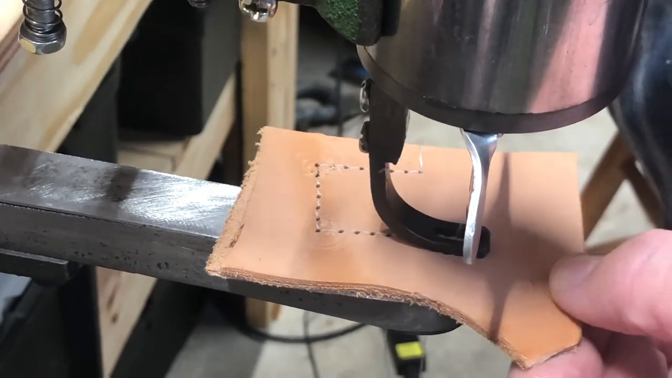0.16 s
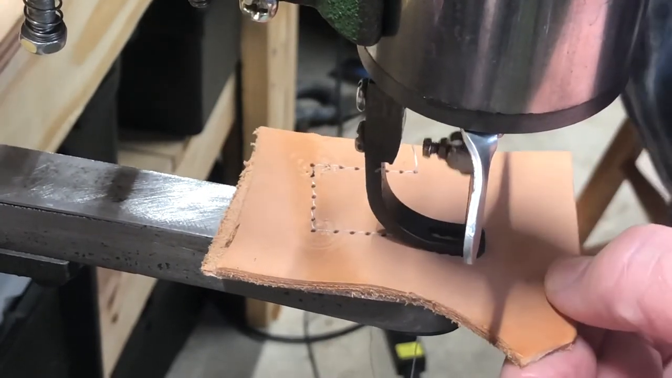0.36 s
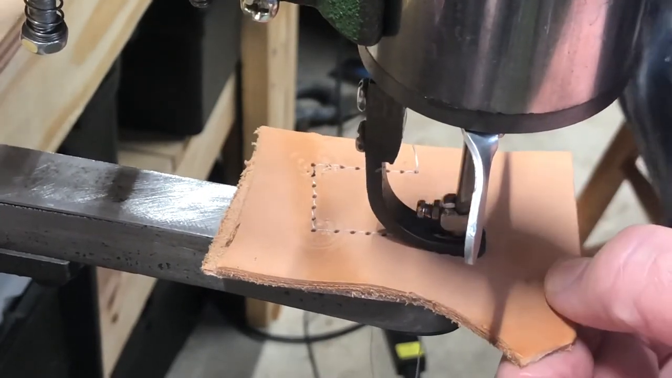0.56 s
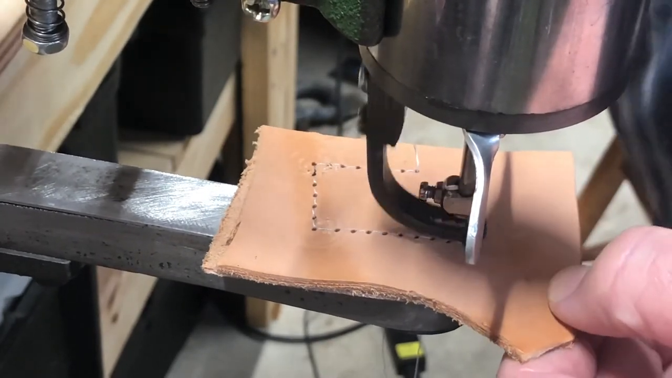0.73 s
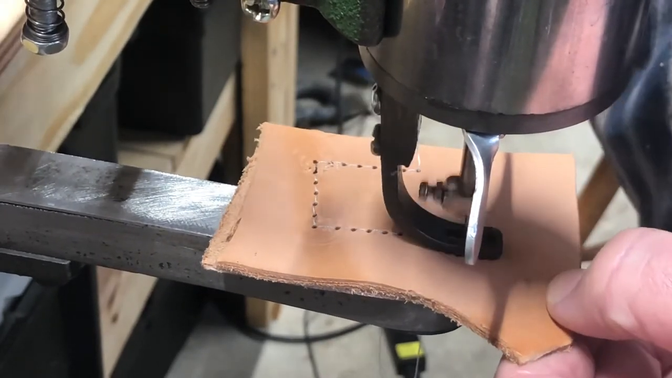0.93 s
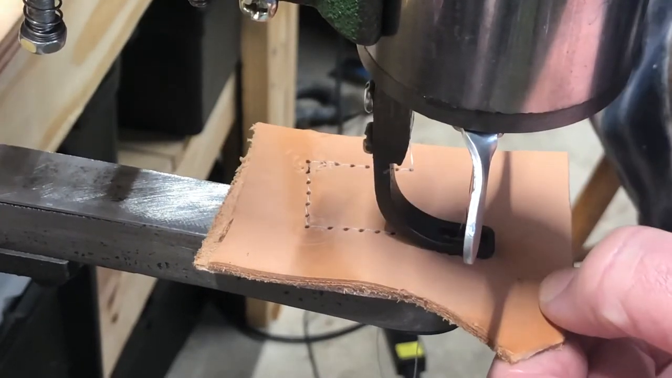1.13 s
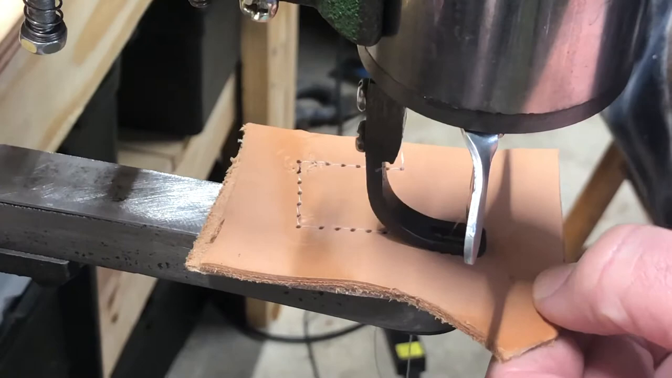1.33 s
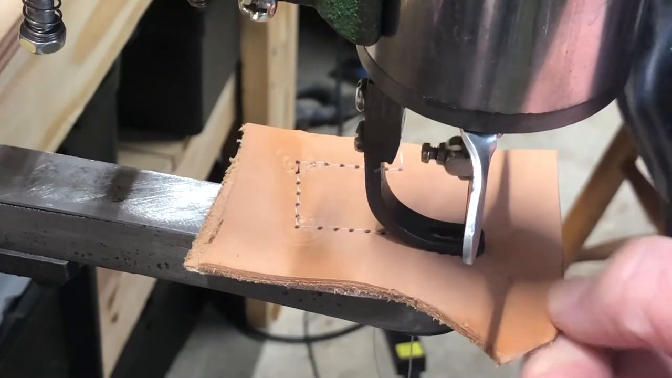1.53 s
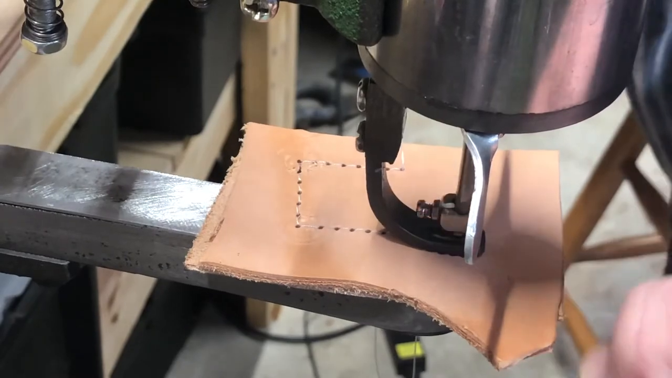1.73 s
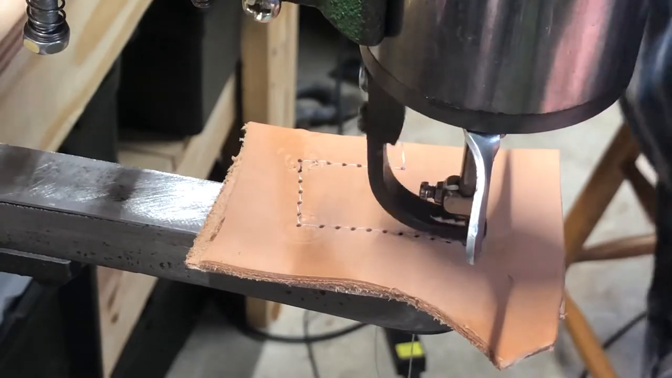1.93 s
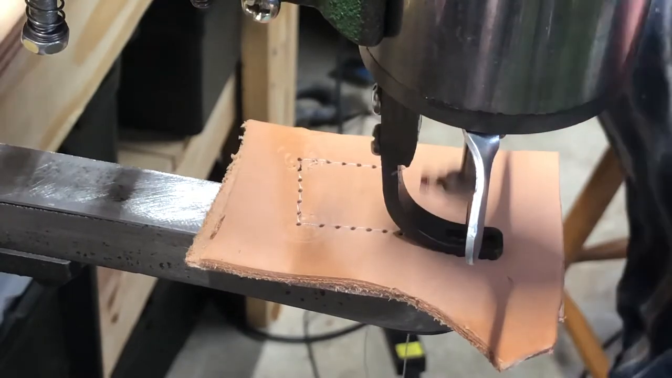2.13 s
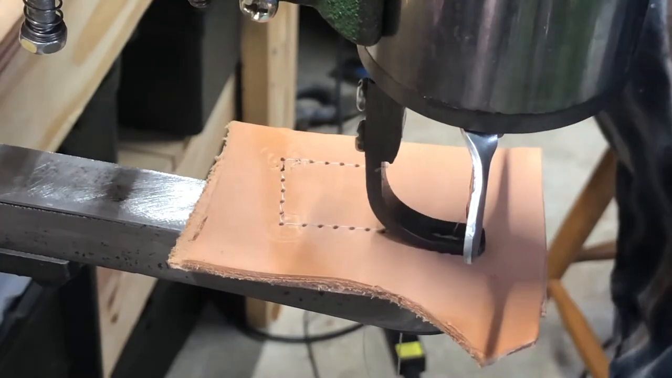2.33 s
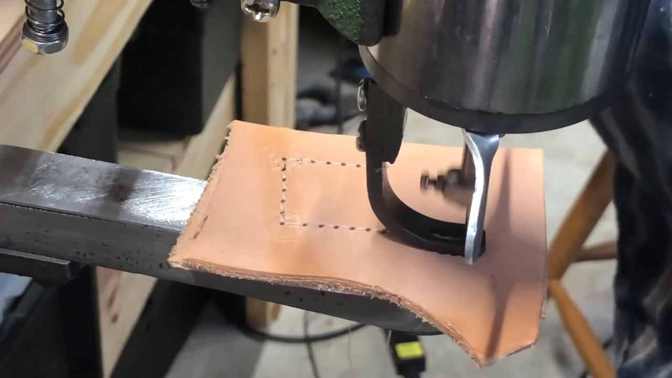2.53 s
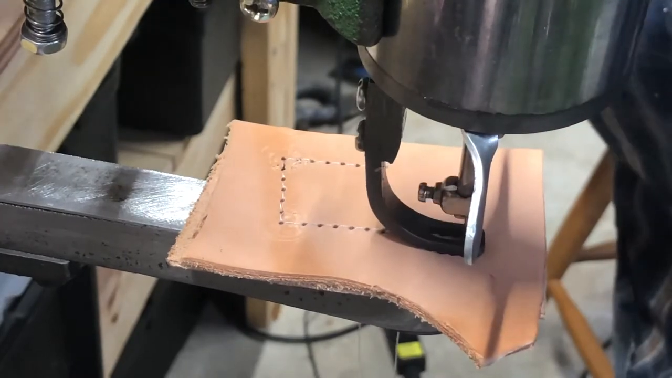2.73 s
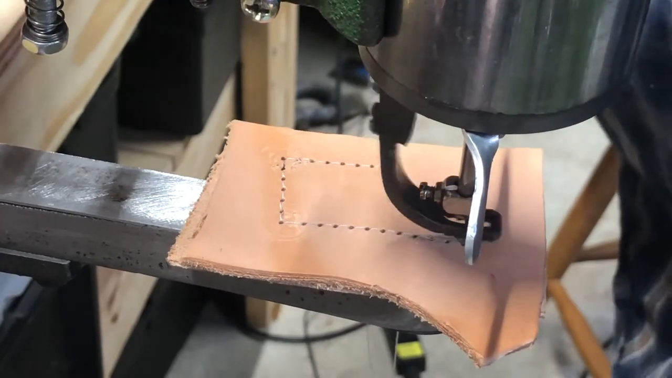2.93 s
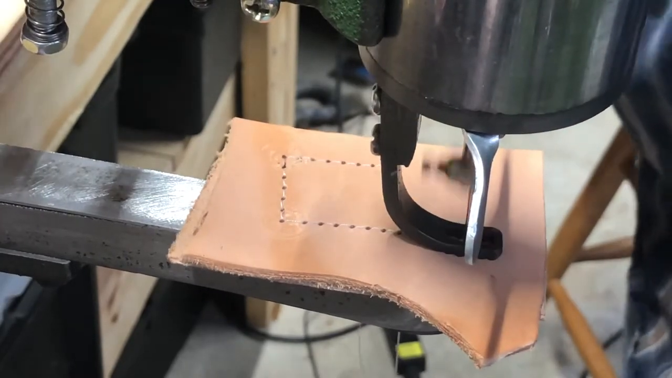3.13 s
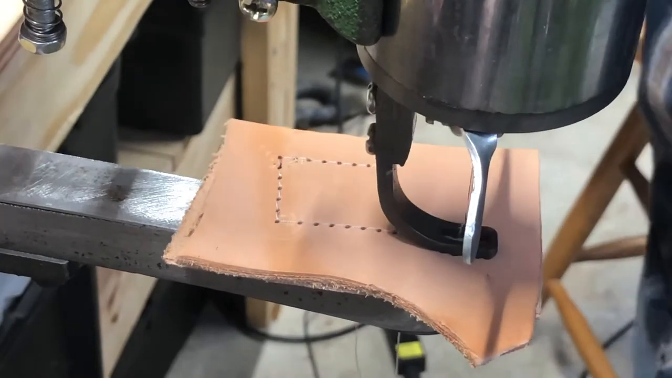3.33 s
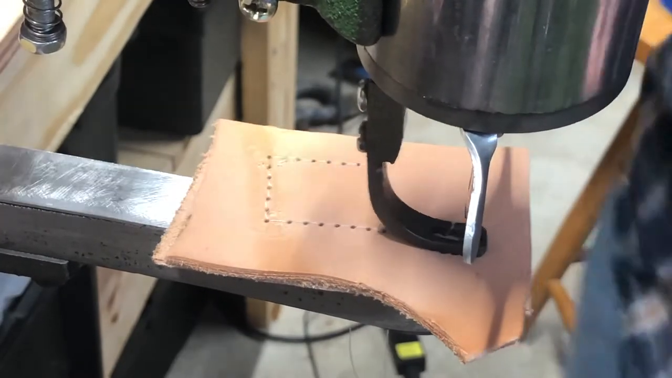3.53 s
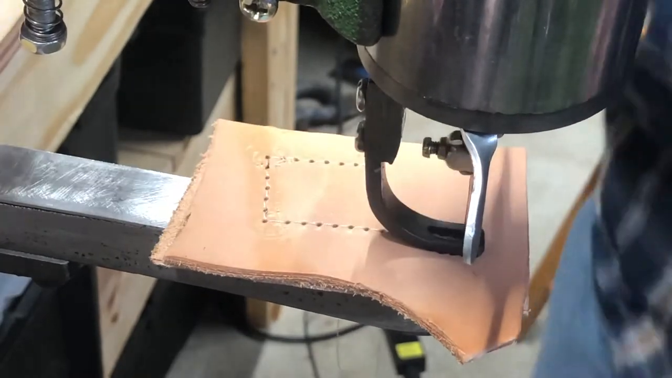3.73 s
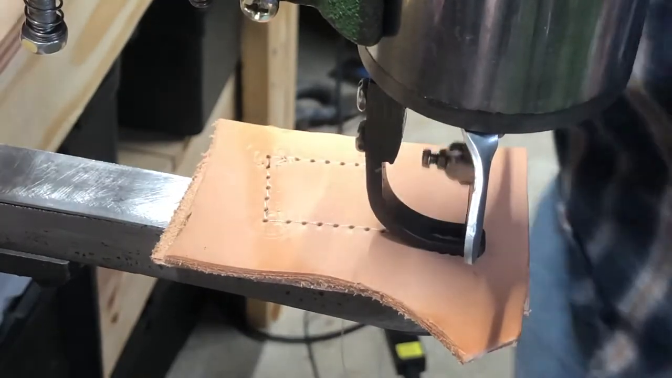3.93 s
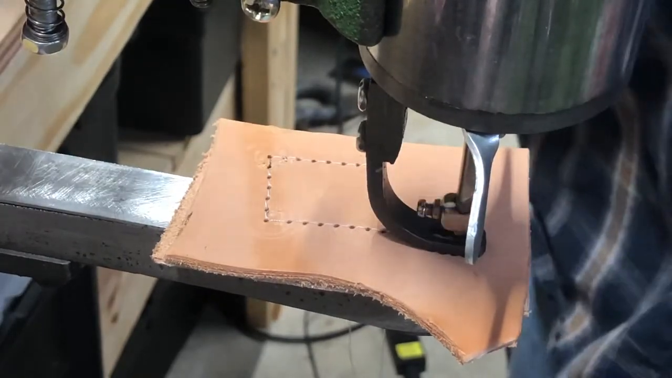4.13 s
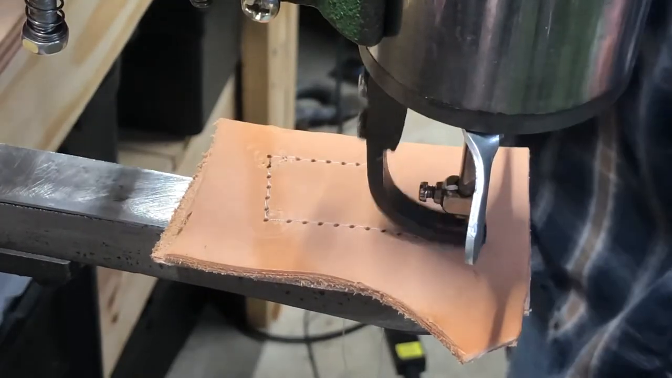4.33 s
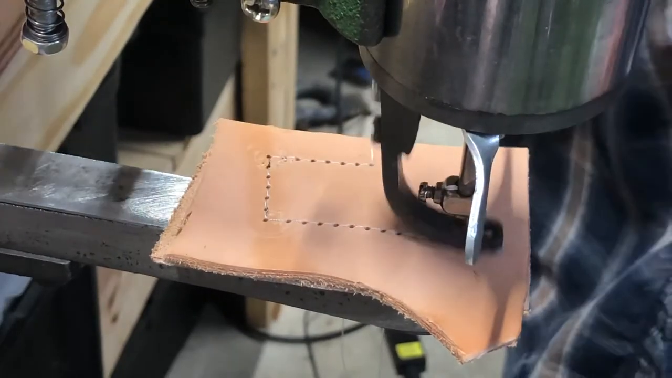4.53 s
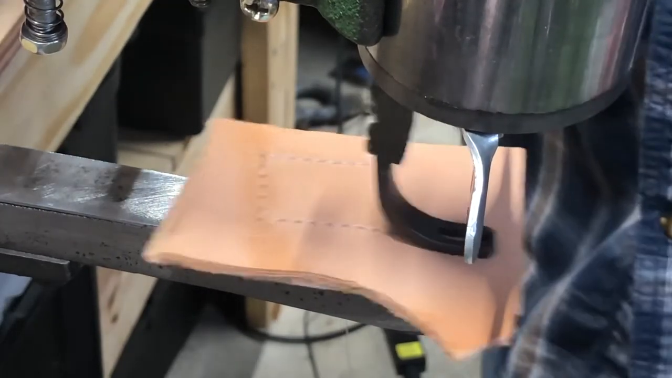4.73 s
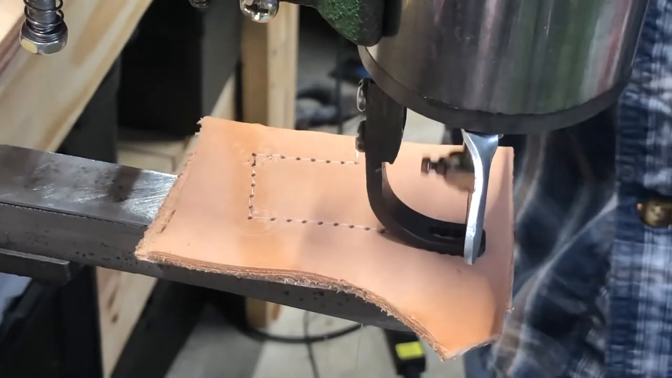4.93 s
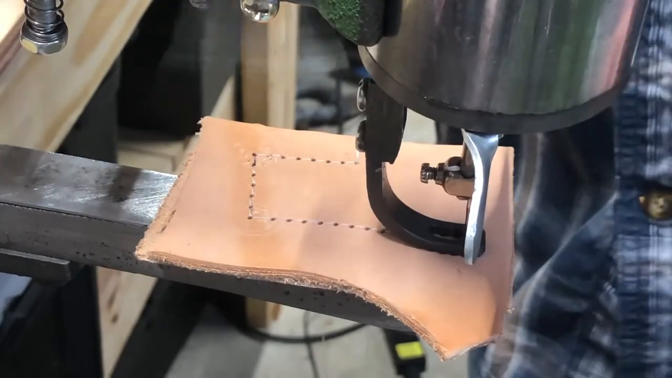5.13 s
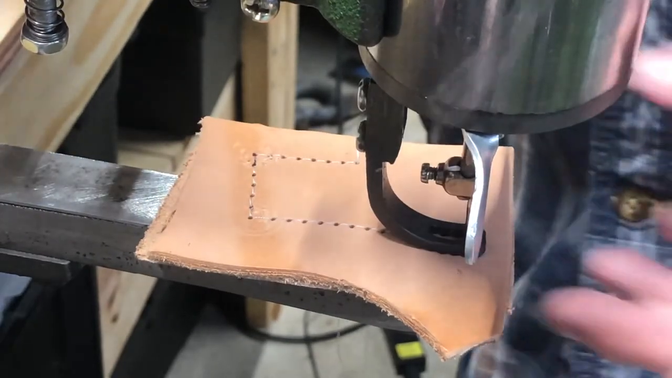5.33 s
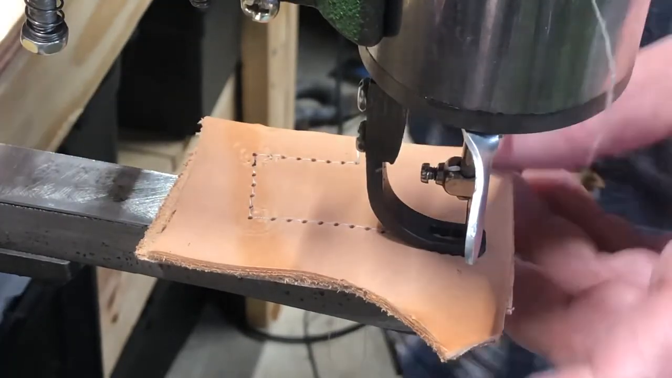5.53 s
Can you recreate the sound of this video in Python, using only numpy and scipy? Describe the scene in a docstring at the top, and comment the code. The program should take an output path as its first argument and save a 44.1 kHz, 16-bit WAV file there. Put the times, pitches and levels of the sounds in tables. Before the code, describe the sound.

A hand-cranked leather stitching machine on a wooden bench makes four slow stitches, heard close up in a workshop with a low steady hum and short reverberation. The stitches run from about 0.4 to 1.0 seconds, 1.5 to 2.1, 2.4 to 3.1 and 3.9 to 4.6. In each, the thread lever ticks, the mechanism thuds, the needle bar clacks, the feed clicks and the presser foot snaps down sharply. Underneath, gears rumble through the iron frame and steel slides scrape, with small rattles and faint, very high squeaks. A soft rumbling swell comes at the start and after each stitch as the needle bar rises. A shirt rustles softly from about 3.3 to 3.8 seconds, and again from 5 seconds as the crank comes to rest. Something creaks faintly at 5.1 seconds, followed by one dry tick at 5.3.

```python
"""A hand-cranked leather stitcher on a wooden bench makes four stitches, close by, in a humming workshop.
Cams and gears rumble through the iron frame and the slides scrape. In each turn the thread lever ticks,
the cam takes up its load with a thud, the needle bar clacks, the feed clicks, the presser foot snaps
down and the needle bar rises in a soft swell. A shirt rustles before the last stitch and again as the
crank comes to rest; something creaks faintly and gives one dry tick."""
import sys
import numpy as np
from scipy import signal
from scipy.fft import rfft, irfft, next_fast_len
from scipy.io import wavfile
from scipy.ndimage import uniform_filter1d

SR = 44100
rng = np.random.default_rng(int(sys.argv[2]) if len(sys.argv) > 2 else 0)


def store_pcm(level_fs):
    """Save levels as 16-bit WAV."""
    pcm = np.round(np.clip(level_fs, -1, 1) * 32767).astype(np.int16)
    wavfile.write(sys.argv[1], SR, np.atleast_2d(pcm).T)


N = 245637
STOP_S = 4.85  # the crank starts coming to rest

# Blows. Each row: start in seconds, relative level in dB, knock over crack in dB, tilt in dB per octave.
LEVER_BLOWS = [(0.38, -33, -9.5, 3.5), (1.5191, -29.5, -9.5, 4), (2.417, -30, -12, 3.5),
               (3.357, -39.5, -0.5, -2.5), (3.9042, -33.5, -10, 2)]
NEEDLE_BLOWS = [(0.5821, -12.5, -19, -0.5), (0.5959, -18.5, 4.5, -2), (1.7654, -14.5, -1.5, 1.5),
                (2.6467, -13, -10, 0.5), (2.6617, -31.5, -4, 3.5), (4.2009, -15, 1.5, 0)]
FEED_BLOWS = [(0.7043, -19.5, 4.5, 4.5), (1.894, -21.5, 5, 4), (2.8336, -27.5, -9, -2),
              (4.374, -26.5, 3.5, 2)]
FOOT_BLOWS = [(0.9195, -12.5, -6, 1.5), (2.0894, -11.5, -7, 3.5), (3.0847, -15, -24, 1),
              (4.6054, -17.5, -21, 5), (4.609, -14, -10.5, 1.5), (4.6136, -8, -15, 0),
              (4.622, -13.5, -12, -2)]
# Iron frame. Each row: frequency in Hz, level in dB.
FRAME_SPECTRUM = [(30, -63), (100, -4), (160, -5.5), (300, 0), (600, -1), (850, -2.5), (1050, -8),
                  (1550, -19.5), (2500, -20), (4000, -27), (8000, -36), (16000, -96.5)]
# Its resonances. Each row: frequency in Hz, width in Hz, lift in dB.
FRAME_MODES = [(186.2, 4.9, 13.5), (235.3, 19.6, 11.5), (321.5, 12, 6), (406, 41, 3), (457.7, 20, 5.5),
               (550, 15, 5), (663, 36, 3), (688, 22, 2.5), (741, 30, 6), (847, 46, -0.5), (912, 25, 1.5),
               (1145, 57, 7.5), (1252, 78, 5.5), (1440, 130, 6.5), (1809, 33, 10), (2130, 100, -0.5),
               (2666, 80, 5), (2980, 94, 5)]
# The cam takes up its load. Each row: start in seconds, relative tick level in dB, thud level in dB,
# run-out after the foot drops in seconds.
CAM_LOADS = [(0.4876, -26, -27.5, 0.2), (1.6604, -24, -31.5, 0.21), (2.5434, -27, -32.5, 0.21),
             (4.0895, -27.5, -37, 0.32)]
# The needle bar rises. Each row: slide release in seconds, delay to the crest in seconds,
# half width in seconds, rumble in dB, scrape in dB, scrape length in seconds.
RETURN_STROKES = [(0.115, 0.068, 0.099, -40, -51, 0.11), (1.2435, 0.066, 0.095, -40.5, -53, 0.11),
                  (2.245, 0.062, .095, -38.5, -48, 0.089), (3.463, 0.072, 0.11, -40, -52, 0.13),
                  (4.707, 0.065, 0.058, -37.5, -47.5, 0.075)]


def amp(db):
    """Decibels to gain."""
    return 10 ** (np.asarray(db) / 20)


def unit(x):
    """Scale to rms 1."""
    return x / np.sqrt(np.mean(x ** 2) + 1e-20)


def fade(t, t60_s):
    """Exponential decay, 60 dB down at t60_s."""
    return np.exp(-np.log(1000) * t / t60_s)


def along(points, hz):
    """Read (Hz, value) points on a log axis."""
    point_hz, values = np.transpose(points)
    return np.interp(np.log(hz + 1), np.log(point_hz), values)


def curve(points):
    """Read (seconds, value) points at every sample."""
    return np.interp(np.arange(N) / SR, *np.transpose(points))


def add(track, start_s, sound):
    """Mix a sound into a track."""
    start = round(start_s * SR)
    part = sound[:max(N - start, 0)]
    track[start:start + len(part)] += part


def through(x, response):
    """Convolve, keeping the length."""
    return signal.fftconvolve(x, response)[:len(x)]


def body(spectrum, modes=(), size=16384):
    """Minimum-phase response of energy 1: a broad spectrum lifted by resonances."""
    hz = np.fft.rfftfreq(size, 1 / SR)
    lift_db = sum(db / (1 + (2 * (hz - mode_hz) / width_hz) ** 2) for mode_hz, width_hz, db in modes)
    bass_cut_db = 12 * np.log2(np.maximum(spectrum[0][0] / (hz + 10), 1))  # small parts lack deep bass
    cepstrum = irfft(np.log(amp(along(spectrum, hz) + lift_db - bass_cut_db)))
    cepstrum[1:size // 2] *= 2
    cepstrum[size // 2 + 1:] = 0
    response = irfft(np.exp(rfft(cepstrum)))[:size // 2]
    return response / np.linalg.norm(response)


def grains(per_s, spread_db, smooth):
    """Tiny uneven contacts over smooth friction noise; rms 1."""
    sizes = amp(spread_db * np.clip(rng.standard_normal(N), -2, 2)) * rng.choice([-1, 1], N)
    contacts = unit(sizes * (rng.random(N) < per_s / SR))
    return unit(contacts + smooth * rng.standard_normal(N))


def waver(hz, width_hz, size):
    """Tone of rms 1, its line widened by phase drift."""
    jitter = uniform_filter1d(rng.standard_normal(size), max(int(SR / width_hz / 4), 1))
    drift_rad = np.cumsum(jitter) * np.sqrt(2 * np.pi * width_hz / SR)
    return np.sqrt(2) * np.sin(2 * np.pi * hz * np.arange(size) / SR + drift_rad)


def workshop_hum():
    """Steady low noise of the workshop."""
    # Each row: frequency in Hz, relative level in dB.
    spectrum = [(20, -24), (40, -51), (55, -10), (70, -4), (82, -8), (98, -27), (120, -15.5), (165, -24),
                (190, -17), (260, -28), (500, -37), (1500, -48.5), (5000, -51), (16000, -60.5)]
    return amp(-50.5) * unit(through(rng.standard_normal(N), body(spectrum)))


def room(x):
    """Short workshop reverberation, longest in the bass."""
    # Each row: frequency in Hz, T60 in seconds.
    decay_times = [(150, 0.71), (1000, 0.23), (5000, 0.086), (15000, 0.21)]
    hz, t, noise = signal.stft(rng.standard_normal(SR // 2), SR, nperseg=256)
    tail = signal.istft(noise * fade(t, along(decay_times, hz)[:, None]), SR, nperseg=256)[1]
    return through(x, np.pad(tail / np.linalg.norm(tail), (int(0.004 * SR), 0)))


def shirt():
    """Cloth rubs in fine grains as the operator shifts."""
    # Each row: time in seconds, relative level in dB.
    levels = [(0, -77), (3.0, -86), (3.3, -63.5), (3.75, -60.5), (4.0, -75.5), (4.97, -73), (5.035, -68.5),
              (5.05, -61), (5.2, -60), (5.35, -62.5), (5.48, -75.5), (5.56, -61.5)]
    # Each row: frequency in Hz, level in dB.
    spectrum = [(200, -20), (1000, 0.5), (4000, -4.5), (9000, -12), (16000, -18.5)]
    rubbing = amp(curve(levels) - 2) * grains(per_s=4000, spread_db=12, smooth=1.9)
    return through(rubbing, body(spectrum))


def creak_and_tick():
    """A faint creak and one dry tick after the last stitch."""
    out = np.zeros(N)
    t = np.arange(SR // 5) / SR
    rub = (1 - np.exp(-t / 0.012)) * fade(t, 0.16) * rng.standard_normal(len(t))
    creak = body([(300, 2), (1400, -5.5), (4000, -21), (9000, -35)], [(1395, 125, 18), (3520, 150, 11)])
    tick = body([(300, -21), (900, -3), (1700, 5), (3000, -5.5), (4500, -39), (12000, -49)])
    add(out, 5.124, amp(-60) * unit(through(rub, creak)))
    add(out, 5.3125, amp(-19.5) * tick)
    return out


def stitches():
    """Seconds at each stitch's stages: 0 lever, 1 load, 2 needle, 3 feed, 4 foot, 5 end of run-out."""
    rows = []
    for load_s, _, _, run_out_s in CAM_LOADS:
        lever_s = max(s for s, *_ in LEVER_BLOWS if s < load_s)
        needle_s, feed_s, foot_s = (min(s for s, *_ in blows if s > load_s)
                                    for blows in (NEEDLE_BLOWS, FEED_BLOWS, FOOT_BLOWS))
        rows.append([lever_s, load_s, needle_s, feed_s, foot_s, foot_s + run_out_s])
    return rows


def motion():
    """Gains of rumble, scrape and boom: coasting, stitches and return strokes, summed in power."""
    # Each row: stitch stage, then gear rumble, slide scrape and bench boom in relative dB.
    stage_levels = [(0, -48.5, -97, -79), (0.35, -43.5, -77.5, -45), (0.75, -46.5, -71, -50),
                    (1.0, -37.5, -57.5, -50.5), (1.2, -32, -57, -37), (1.55, -37, -47, -37),
                    (1.85, -31, -45, -34.5), (2.2, -32.5, -46, -52.5), (2.5, -37, -61.5, -35),
                    (2.901, -41, -59.5, -49.5), (3.1, -38, -61, -45), (3.351, -40, -45.5, -47),
                    (3.55, -37, -50, -35.5), (3.7, -33, -50.5, -39.5), (4.0, -30.5, -47, -43),
                    (4.2, -38.5, -48.5, -35.5), (4.4, -49.5, -54.5, -37), (5.0, -92.5, -98, -60.5)]
    # Hand on the crank. Each row: time in seconds, gain in dB.
    effort = [(0.4, 0), (0.55, 2.5), (0.9, 0.5), (1.6, -1.5), (1.8, 1), (2.05, 2.5), (2.45, -1.5),
              (2.65, 1), (2.83, -3.5), (2.95, -1), (3.08, -1.5), (3.9, 0.5), (4.02, -16), (4.1, -2),
              (4.35, 0.5), (4.6, -0.5)]
    # Rumble, scrape and boom while coasting.
    idle_db = (-60.5, -79, -56)
    spin_up_s, stop_db_per_s = 0.035, 47
    rise_db_per_s, fall_db_per_s = 503.5, 354
    t = np.arange(N) / SR
    stages, *levels_db = np.transpose(stage_levels)
    effort_db = curve(effort)
    power = np.outer(amp(idle_db), amp(-stop_db_per_s * np.maximum(t - STOP_S, 0))) ** 2
    for times in stitches():
        stage = np.interp(t, times, np.arange(len(times)))
        turning = np.clip(1 + (t - times[0]) / spin_up_s, 0, 1) * (t < times[-1])
        power += turning * amp([np.interp(stage, stages, db) + effort_db for db in levels_db]) ** 2
    for start_s, crest_s, half_width_s, rumble_db, scrape_db, length_s in RETURN_STROKES:
        swell_db = rumble_db - 11.5 * ((t - start_s - crest_s) / half_width_s) ** 2
        before_s, after_s = np.maximum(start_s - t, 0), np.maximum(t - start_s - length_s, 0)
        slide_db = scrape_db - rise_db_per_s * before_s - fall_db_per_s * after_s
        power += amp([swell_db, slide_db, swell_db - 2.5]) ** 2
    return np.sqrt(power)


def shifting(x, depth_db):
    """The contact point travels round the cam, so resonances come and go."""
    spectra = signal.stft(x, nperseg=1024)[2]
    field = uniform_filter1d(rng.standard_normal(spectra.shape), size=3, axis=0)
    field = unit(uniform_filter1d(field, size=4, axis=1))
    return signal.istft(spectra * unit(amp(depth_db * field)), nperseg=1024)[1][:N]


def crank(rumble_gain, scrape_gain, boom_gain):
    """Rough cams shake the frame, the slides catch and scrape, the bench booms at its lowest mode."""
    # Each row: frequency in Hz, level in dB.
    scrape_spectrum = [(300, -39.5), (1500, 7.5), (3000, 1), (4800, 3.5), (6300, -5), (7200, -5),
                       (8500, -2.5), (10000, -4), (12000, -3.5), (13500, -8.5), (15500, -7.5), (16500, -35)]
    # Moving steel parts. Each row: frequency in Hz, width in Hz, lift in dB.
    slide_modes = [(2040, 110, 4.5), (3510, 280, 7), (4170, 75, 1), (4650, 90, 1.5), (5300, 90, 4.5),
                   (5940, 120, 7.5), (6640, 170, 5), (7600, 140, 9.5), (8400, 216, 1.5), (9900, 70, -2),
                   (12700, 250, 3), (14100, 150, 11), (15430, 110, 8.5)]
    cams = shifting(grains(per_s=1400, spread_db=3.5, smooth=0.76), depth_db=2.5)
    rumble = through(rumble_gain * cams, body(FRAME_SPECTRUM, [*FRAME_MODES, *slide_modes]))
    catches = np.abs(grains(per_s=380, spread_db=9.5, smooth=0))
    chatter = unit(through(catches, fade(np.arange(SR // 20) / SR, 0.017)))
    friction = unit((0.43 + chatter) * shifting(rng.standard_normal(N), depth_db=2.5))
    scrape = through(scrape_gain * friction, body(scrape_spectrum, slide_modes))
    bench = signal.butter(2, [108, 142], "bandpass", fs=SR, output="sos")
    boom = signal.sosfiltfilt(bench, amp(-2.5) * boom_gain * waver(hz=122.7, width_hz=7.88, size=N))
    return rumble + scrape + boom


def squeaks():
    """Stick-slip whistles of a dry steel slide swell and ring away."""
    # Each row: stitch stage, level in dB.
    dry_spots = [(1.72, -44), (3.42, -57), (4.04, -47.5)]
    # The foot's hardest drop squeals higher: start in seconds, frequency in Hz, level in dB.
    last_squeak = (4.617, 15400, -38)
    squeak_hz, swell_s, return_db = 13600, 0.009, -54
    out = np.zeros(N)
    t = np.arange(SR // 6) / SR
    envelope = t / swell_s * np.exp(1 - t / swell_s)
    stitching = [(np.interp(stage, np.arange(len(times)), times), squeak_hz, db)
                 for times in stitches() for stage, db in dry_spots]
    rising = [(s, squeak_hz, return_db) for s, *_ in RETURN_STROKES]
    for start_s, hz, db in stitching + rising + [last_squeak]:
        whistle = waver(hz * (1 + rng.normal(0, 0.006)), width_hz=200, size=len(t))
        add(out, start_s, amp(db) * envelope * whistle)
    return out


def presser_spring():
    """The foot's spring pings with two high notes as it settles."""
    # Each row: start in seconds, level in dB.
    pings = [(.964, -40), (2.128, -41)]
    out = np.zeros(N)
    t = np.arange(SR // 3) / SR
    envelope = fade(t, 0.045) + amp(-19) * fade(t, 0.3)
    for start_s, db in pings:
        upper = waver(hz=11070, width_hz=260, size=len(t))
        lower = amp(-13) * waver(hz=8010, width_hz=80, size=len(t))
        add(out, start_s, amp(db) * (upper + lower) * envelope)
    return out


def thuds():
    """Slack closes under load and jolts the frame."""
    lag_s = 0.014
    jolts = np.zeros(N)
    t = np.arange(SR // 5) / SR
    for load_s, _, db, _ in CAM_LOADS:
        add(jolts, load_s + lag_s, amp(db) * fade(t, 0.075) * rng.standard_normal(len(t)))
    return through(jolts, body(FRAME_SPECTRUM, FRAME_MODES))


def strikes(blows, steel, mount, gain_db, rise_s, t60_s, ring_db, ring_t60_s, knock_t60_s):
    """Steel on steel: a short crack, a weaker dense ring of the part, a knock in its mount."""
    t = np.arange(16384) / SR
    octaves = np.log2(np.maximum(np.fft.rfftfreq(len(t), 1 / SR), 1000) / 6000)
    attack = 1 - np.exp(-(t / rise_s) ** 2)
    envelope = attack * (fade(t, t60_s) + amp(ring_db) * fade(t, ring_t60_s))
    out = np.zeros(N)
    for start_s, db, knock_db, tilt_db_per_octave in blows:
        contact = irfft(rfft(rng.choice([-1, 1], len(t))) * amp(tilt_db_per_octave * octaves))
        crack = unit(through(envelope * contact, steel))
        knock = unit(through(fade(t, knock_t60_s) * rng.standard_normal(len(t)), mount))
        add(out, start_s, amp(db + gain_db) * (crack + amp(knock_db) * knock))
    return out


def linkage(scrape_gain):
    """Play in the linkage: loud knocks, ticks that every turn repeats, a rattle following the scrape."""
    # Each row: start in seconds, relative level in dB, knock over crack in dB, tilt in dB per octave.
    knocks = [(0.6518, -23.5, -6, 1), (0.839, -21.5, -5, -3), (1.321, -31.5, 3.5, 2), (1.8309, -24, -12, 2),
              (1.957, -21.5, -16, -5), (2.0383, -16.5, -9, -2.5), (2.3087, -30.5, 0, 6),
              (2.709, -25, -20, 2), (2.897, -23, -12, -3), (2.9237, -24.5, -18, -4.5),
              (3.0064, -18.5, -25, -3.5), (4.338, -31, 8, 7), (4.4561, -22.5, -2, -2.5),
              (4.522, -27.5, 8, -5.5)]
    # Each row: frequency in Hz, level in dB.
    spectrum = [(200, 10), (2000, -2), (3300, 4), (4500, -0.5), (6200, 0.5), (7500, -1.5), (8600, 0.5),
                (10500, 0), (12000, -2.5), (14000, -7), (16000, -19)]
    # Each row: frequency in Hz, width in Hz, lift in dB.
    modes = [(3300, 470, 3.9), (4480, 430, 5), (5780, 130, 5), (8400, 210, 1.9), (10000, 426, 1.3),
             (11600, 180, 1.9)]
    rattle_per_s, spread_db, catch_lead_s = 12, 6.5, 0.036
    blows = list(knocks) + [(s, db, -8, -4) for s, db, _, _ in CAM_LOADS]
    # The needle bar catches just before its clack and again as it starts to rise.
    blows += [(times[2] - catch_lead_s, -23.5, -5, -1.5) for times in stitches()]
    blows += [(s, -34, -3, 1.5) for s, *_ in RETURN_STROKES]
    for _ in range(round(rattle_per_s * STOP_S)):
        start_s = rng.uniform(0, STOP_S)
        scrape_db = 20 * np.log10(scrape_gain[int(start_s * SR)])
        blows.append((start_s, scrape_db + 10.5 + rng.uniform(-spread_db, spread_db), -7, 0.5))
    return strikes(blows, body(spectrum, modes), body(FRAME_SPECTRUM, FRAME_MODES), gain_db=-29,
                   rise_s=0.00093, t60_s=0.026, ring_db=-16.5, ring_t60_s=0.12, knock_t60_s=0.082)


def thread_lever():
    """The lever ticks as each turn begins and once faintly between turns; its arm rings."""
    # Each row: frequency in Hz, level in dB.
    spectrum = [(200, 13.5), (1600, -0.5), (2800, 3), (3600, -3.5), (4500, 1.5), (6000, 3), (7500, -14.5),
                (8600, 2), (9800, -14.5), (12200, -11.5), (13300, -19), (16000, -22)]
    # Each row: frequency in Hz, width in Hz, lift in dB.
    arm_modes = [(1950, 89, 11), (2460, 13, 9.4), (2870, 89, 14), (2980, 120, 9.7), (4500, 17, 9.7)]
    arm = body([(500, -9), (2800, -5), (6000, -6), (12000, -20)], arm_modes)
    return strikes(LEVER_BLOWS, body(spectrum), arm, gain_db=-25.5,
                   rise_s=0.0012, t60_s=0.028, ring_db=-43, ring_t60_s=0.066, knock_t60_s=0.3)


def feed():
    """The feed clicks and knocks in the machine's arm."""
    # Each row: frequency in Hz, level in dB.
    spectrum = [(200, 1.5), (1250, 2), (2000, 3), (3200, -4.5), (4200, -5), (5500, -2), (7800, -6.5),
                (8900, 0), (9800, -16), (12800, -23.5), (13700, -15), (16000, -22)]
    # Each row: frequency in Hz, width in Hz, lift in dB.
    modes = [(3340, 150, 16), (4770, 130, 5)]
    arm_modes = [(349, 48, 18.5), (1126, 150, 16.5), (1224, 95, 13), (1436, 130, 22.5), (3560, 90, 20)]
    return strikes(FEED_BLOWS, body(spectrum, modes), body(FRAME_SPECTRUM, arm_modes), gain_db=-27,
                   rise_s=0.00048, t60_s=0.022, ring_db=-16, ring_t60_s=0.071, knock_t60_s=0.15)


def needle_bar():
    """The bar clacks and knocks in the machine's head."""
    # Each row: frequency in Hz, level in dB.
    spectrum = [(200, -26.5), (800, 1), (1500, -2), (2100, -4.5), (3000, -3), (4200, -6), (6000, -7.5),
                (6900, -2.5), (7800, -10.5), (10000, -20), (10900, -8), (12200, -18.5), (13200, -10),
                (16000, -27)]
    # Each row: frequency in Hz, width in Hz, lift in dB.
    modes = [(823, 110, 14.7), (1191, 50, 15.1), (1840, 120, 15), (2164, 68, 10), (2300, 88, 9.1),
             (2900, 380, 7.8), (3400, 140, 10)]
    return strikes(NEEDLE_BLOWS, body(spectrum, modes), body(FRAME_SPECTRUM, modes), gain_db=-27.5,
                   rise_s=0.00039, t60_s=0.016, ring_db=-24, ring_t60_s=0.16, knock_t60_s=0.23)


def presser_foot():
    """The foot snaps down and knocks the frame."""
    # Each row: frequency in Hz, level in dB.
    spectrum = [(200, -9), (1500, -8), (2400, -6.5), (3300, -4), (4500, -7), (6000, -6.5), (6800, 2),
                (7500, -8), (8500, -3.5), (9600, -16.5), (11000, -11.5), (12000, -18), (13500, -10.5),
                (16000, -29.5)]
    # Each row: frequency in Hz, width in Hz, lift in dB.
    modes = [(2525, 75, 10.9), (5360, 86, 6.7), (7700, 190, 6), (10700, 84, 7.3), (13400, 200, 4),
             (14000, 58, 8.7), (15660, 90, 11)]
    return strikes(FOOT_BLOWS, body(spectrum, modes), body(FRAME_SPECTRUM, FRAME_MODES), gain_db=-29.5,
                   rise_s=0.0005, t60_s=0.009, ring_db=-16, ring_t60_s=0.052, knock_t60_s=0.15)


def scene():
    """Machine and operator, their reverberation and the workshop hum; mono."""
    rumble_gain, scrape_gain, boom_gain = motion()
    direct = crank(rumble_gain, scrape_gain, boom_gain) + thuds()
    direct += presser_foot() + needle_bar() + feed() + thread_lever() + linkage(scrape_gain)
    direct += squeaks() + presser_spring() + shirt() + creak_and_tick()
    return (workshop_hum() + direct + amp(-14) * room(direct))[None]


def record(dry):
    """Brick-wall low-pass."""
    top_hz = 16300
    size = next_fast_len(N + SR // 2)
    passband = np.fft.rfftfreq(size, 1 / SR) < top_hz
    return irfft(rfft(dry, size) * passband, size)[:, :N]


dry = scene()
out = record(dry)
store_pcm(out)
```